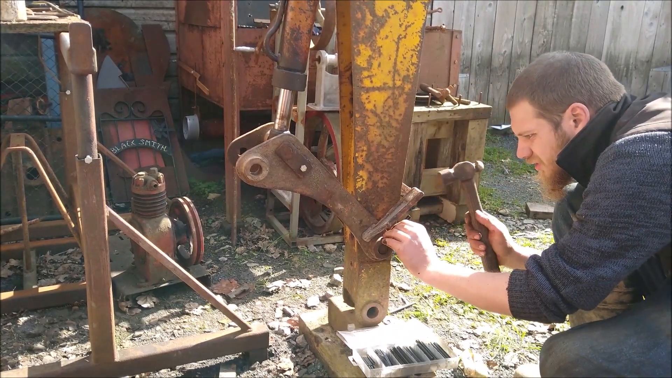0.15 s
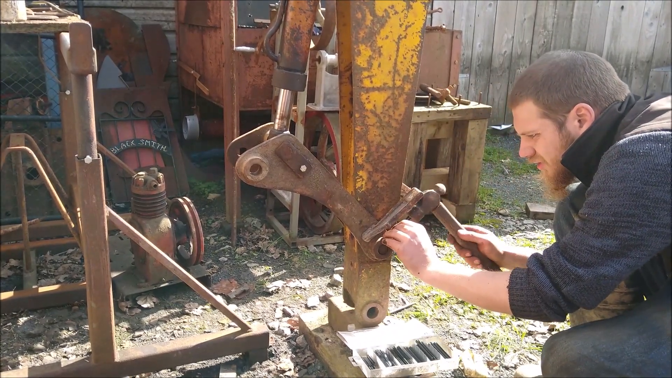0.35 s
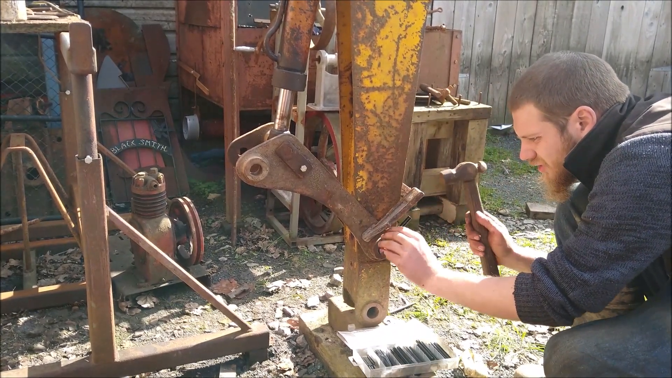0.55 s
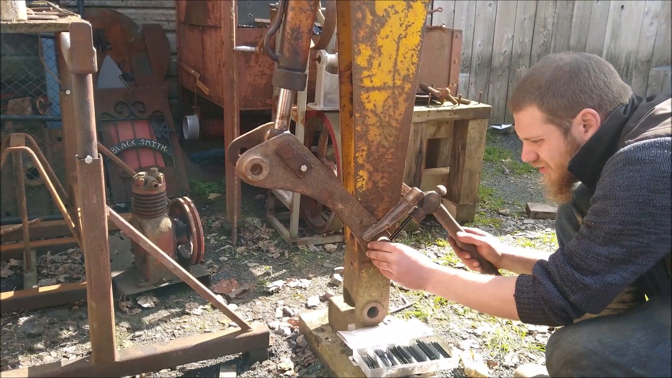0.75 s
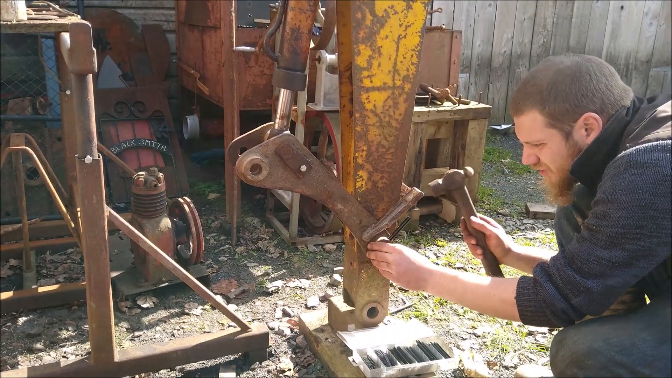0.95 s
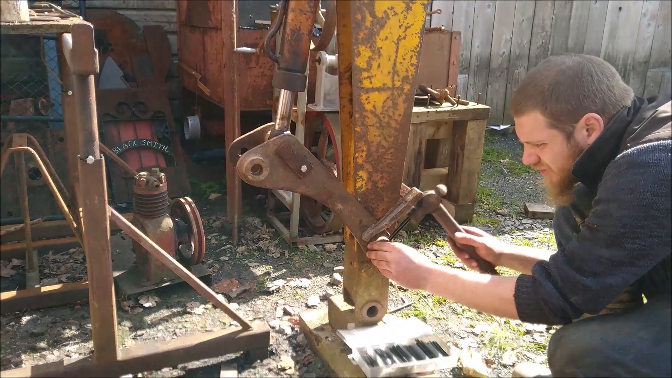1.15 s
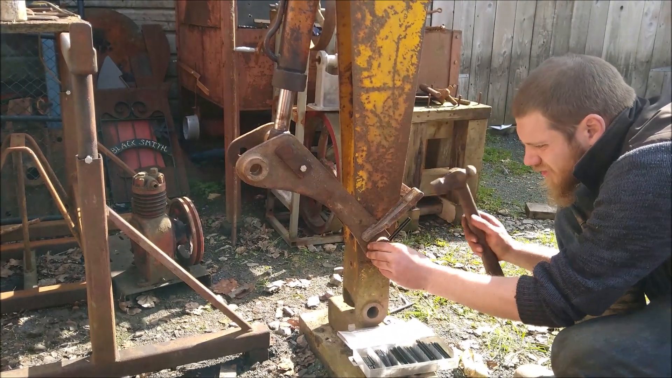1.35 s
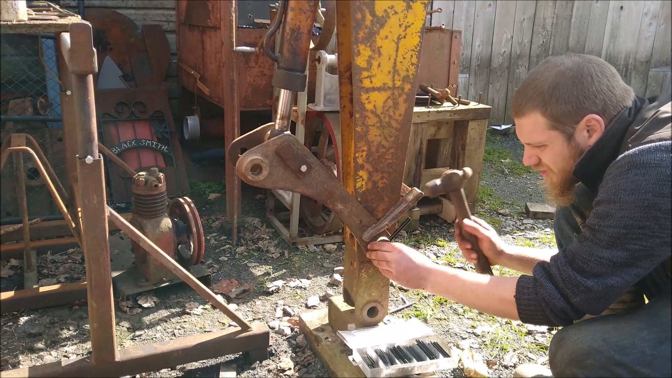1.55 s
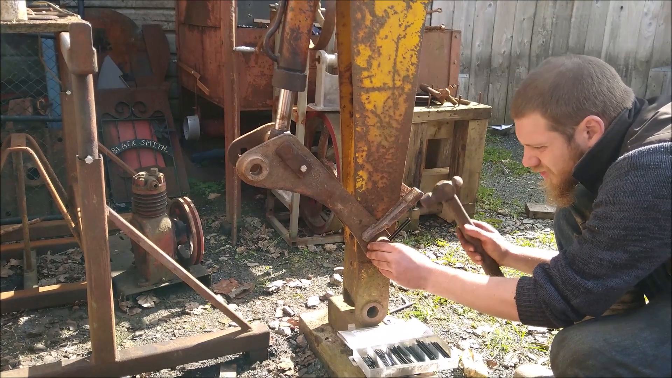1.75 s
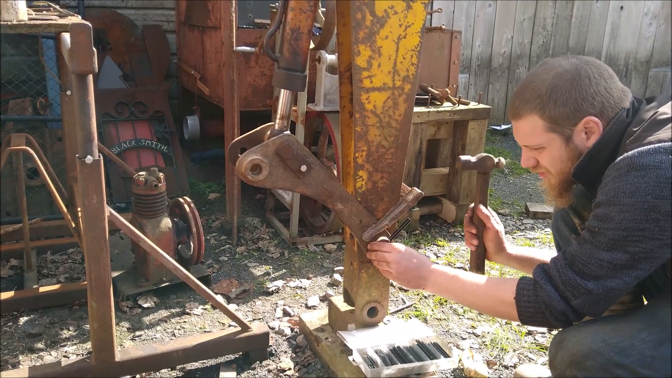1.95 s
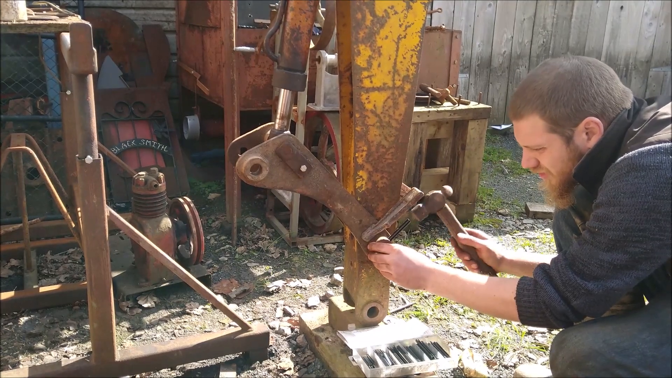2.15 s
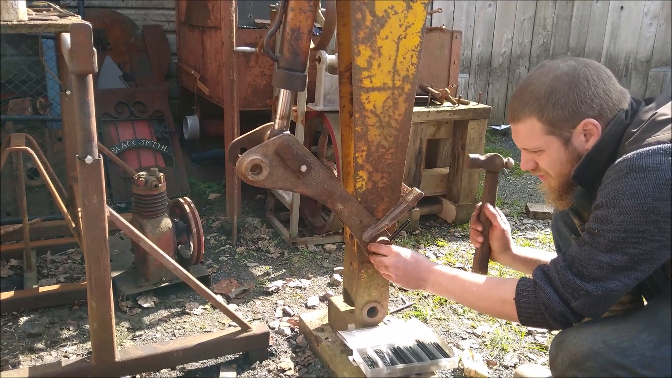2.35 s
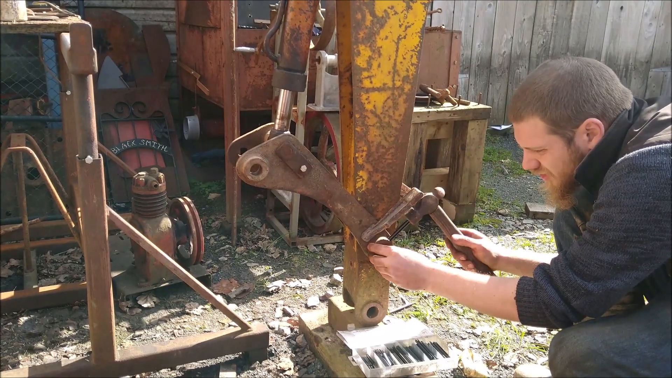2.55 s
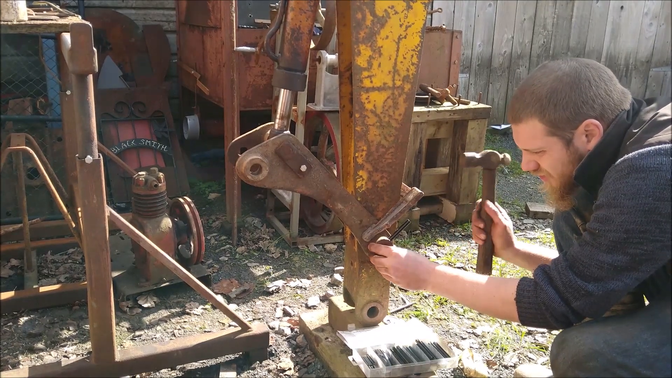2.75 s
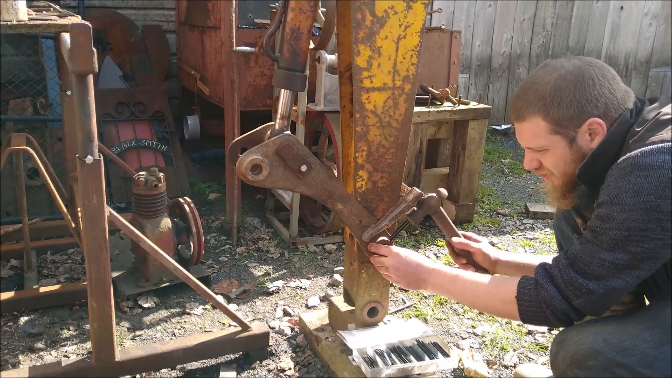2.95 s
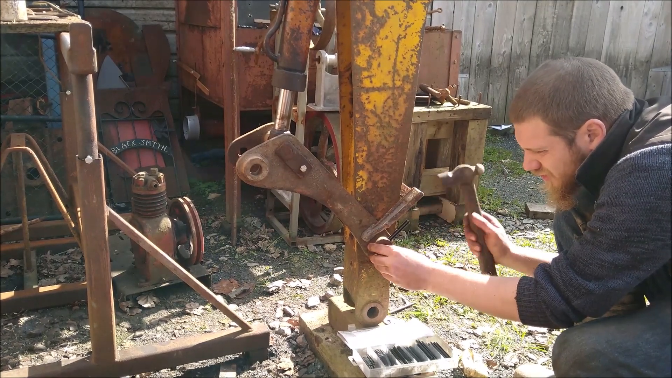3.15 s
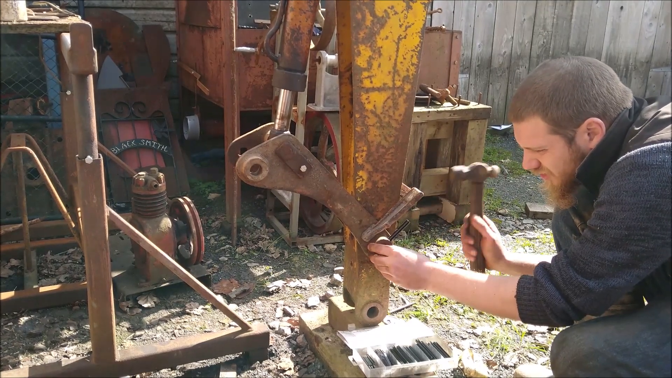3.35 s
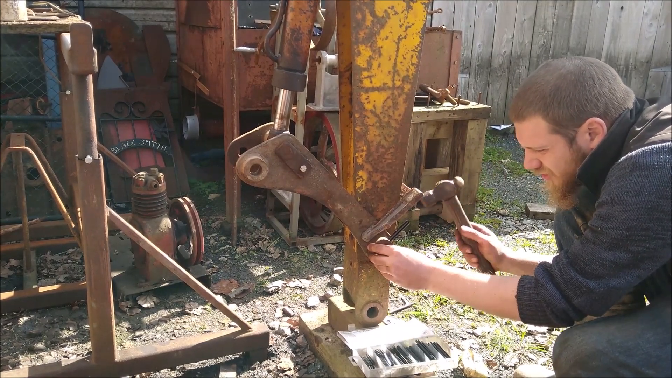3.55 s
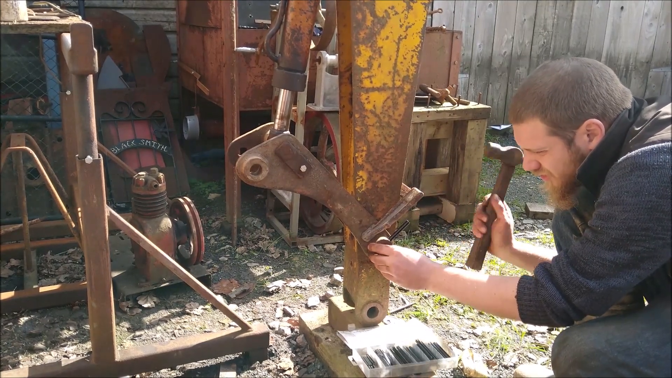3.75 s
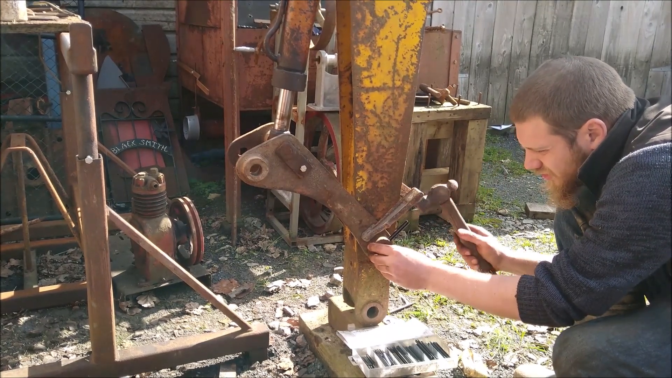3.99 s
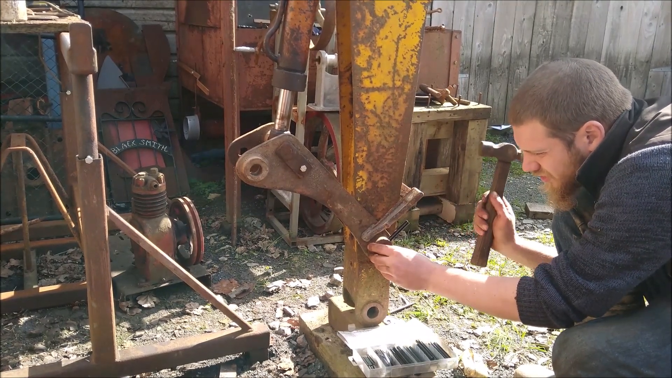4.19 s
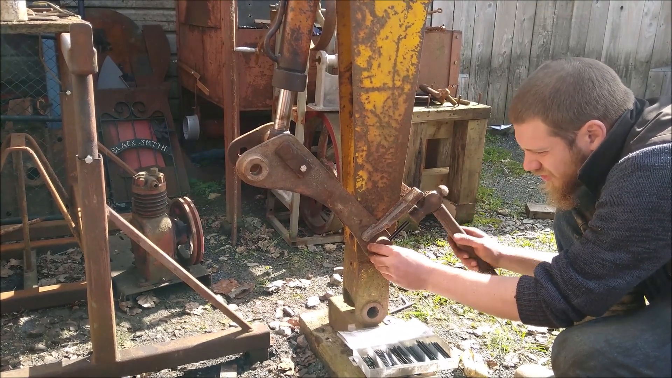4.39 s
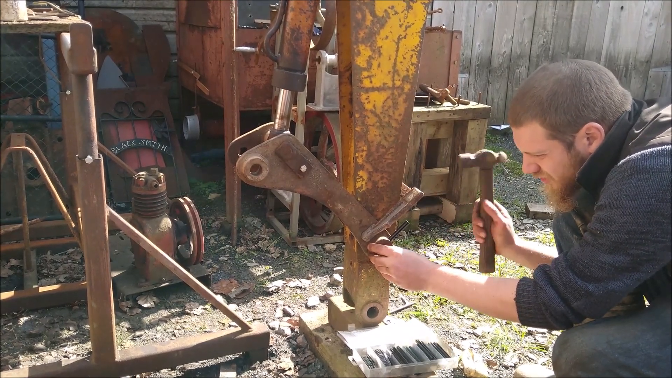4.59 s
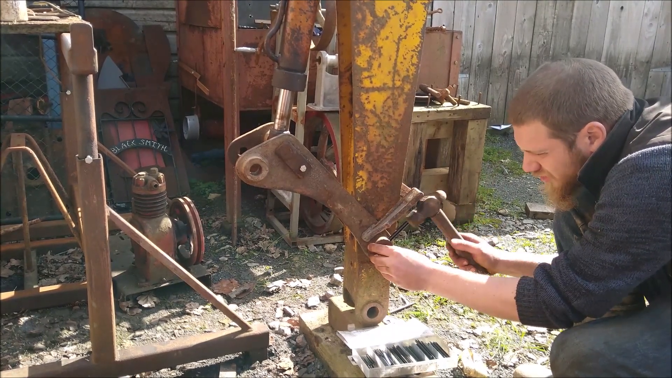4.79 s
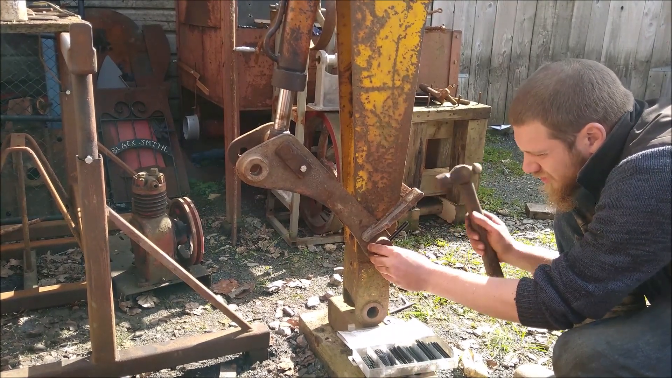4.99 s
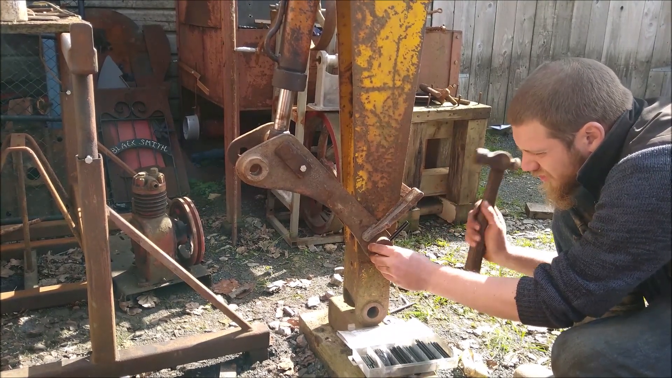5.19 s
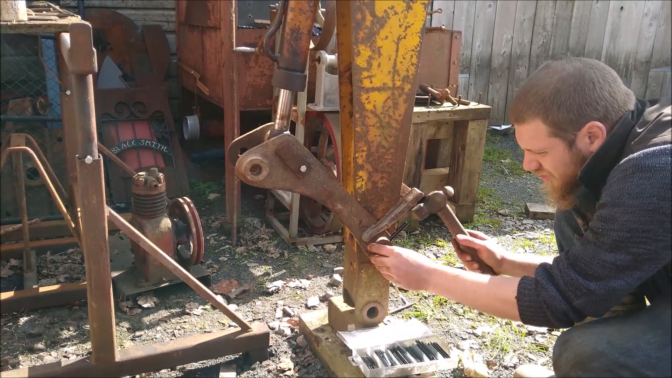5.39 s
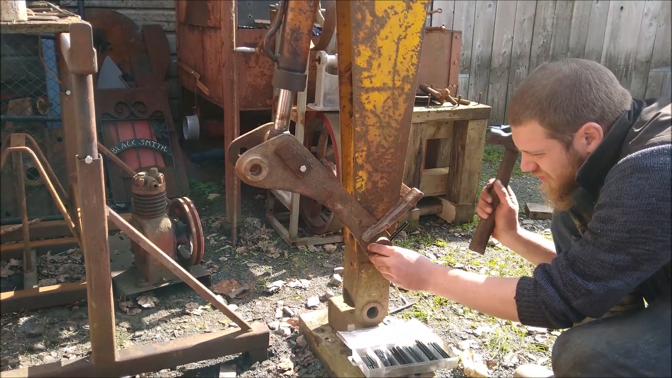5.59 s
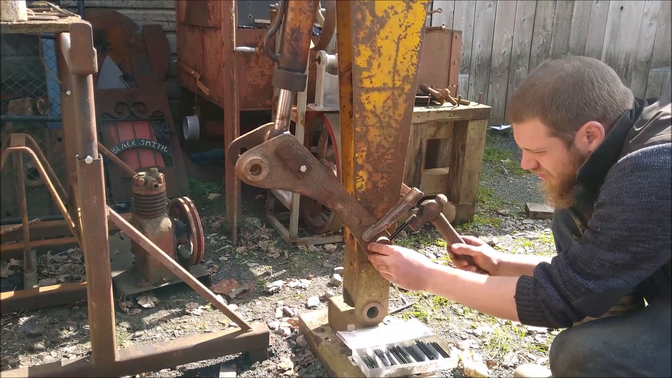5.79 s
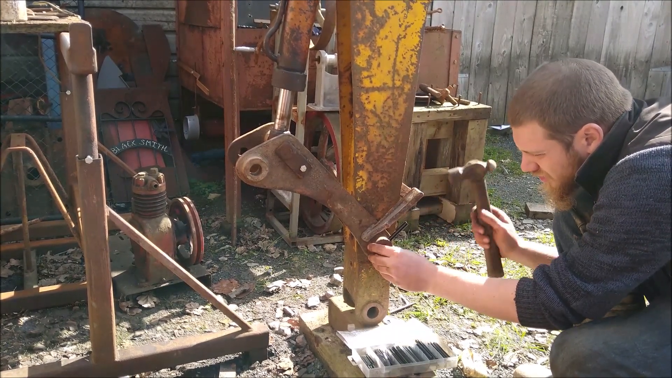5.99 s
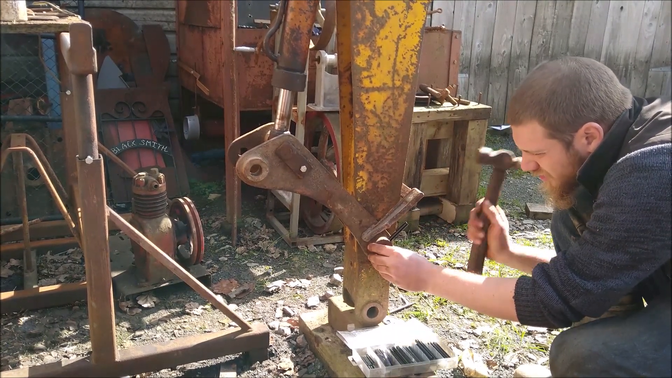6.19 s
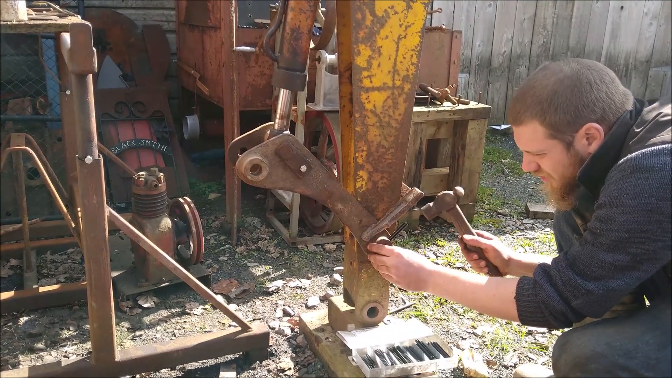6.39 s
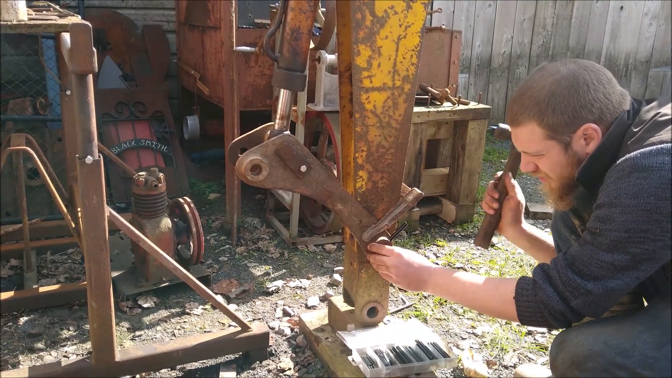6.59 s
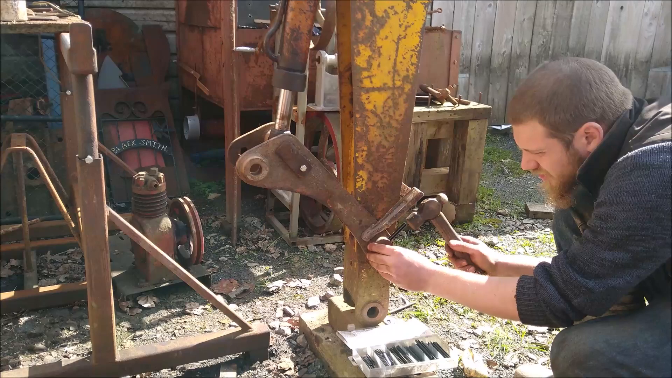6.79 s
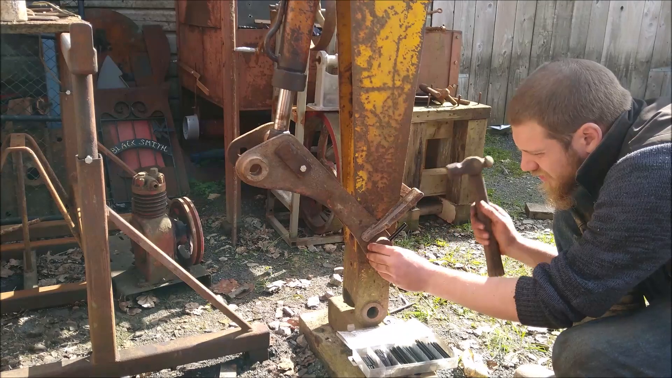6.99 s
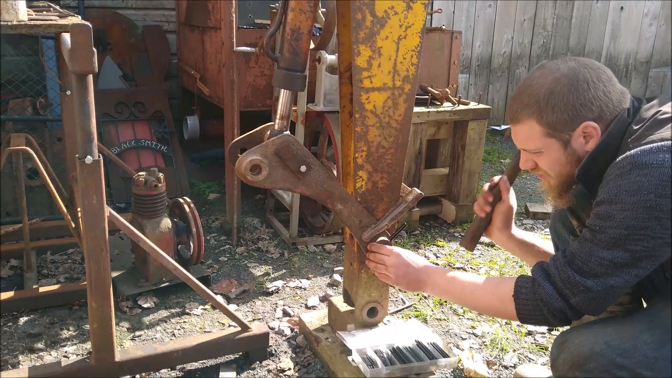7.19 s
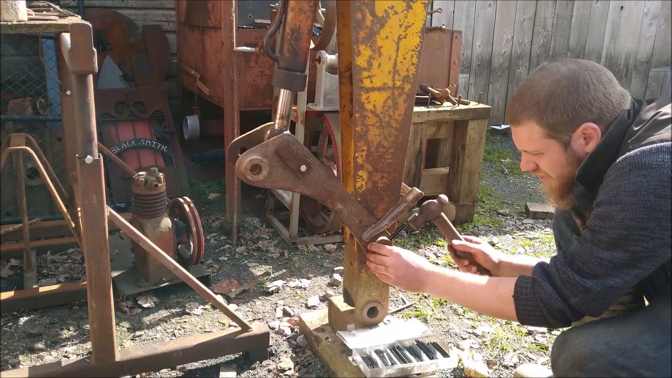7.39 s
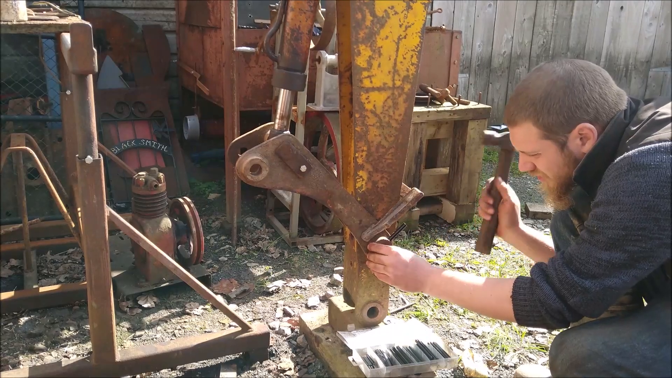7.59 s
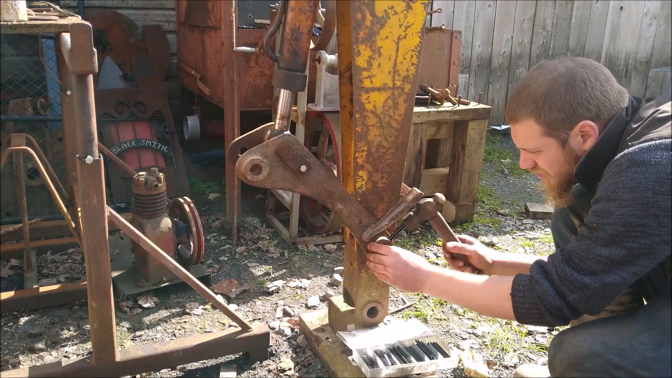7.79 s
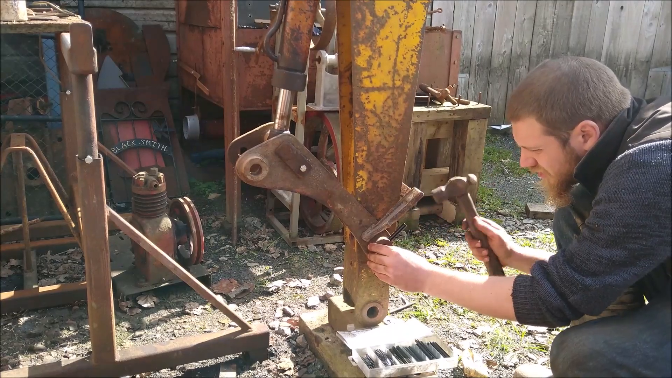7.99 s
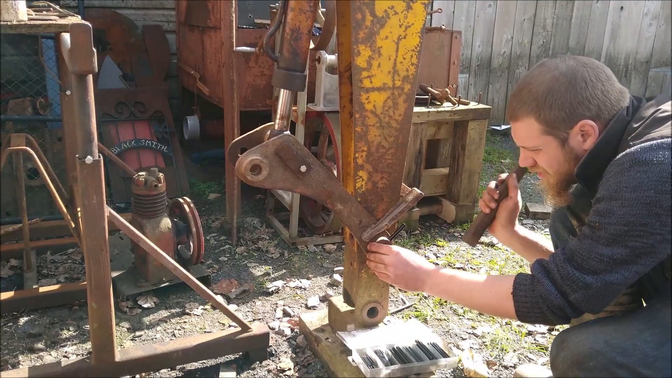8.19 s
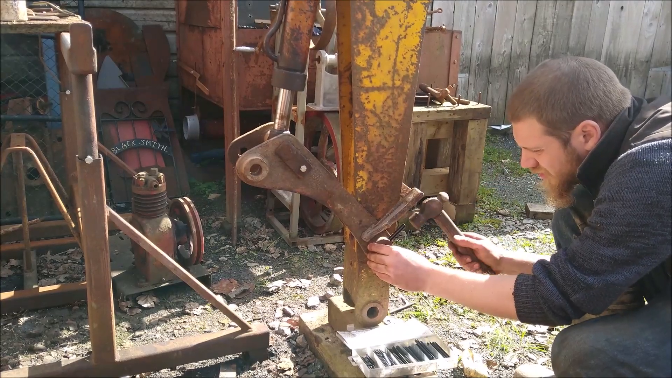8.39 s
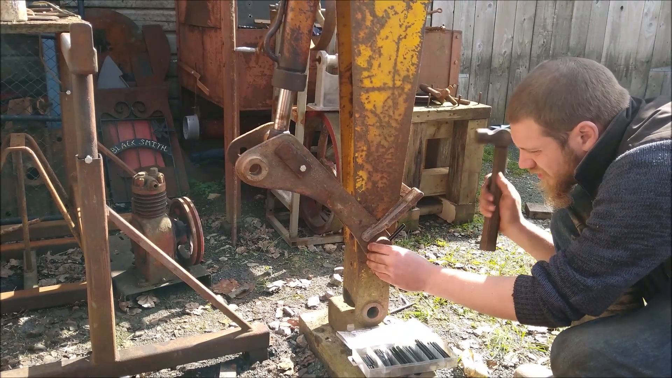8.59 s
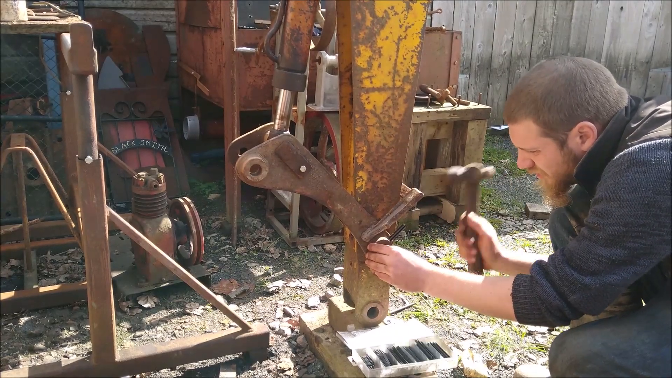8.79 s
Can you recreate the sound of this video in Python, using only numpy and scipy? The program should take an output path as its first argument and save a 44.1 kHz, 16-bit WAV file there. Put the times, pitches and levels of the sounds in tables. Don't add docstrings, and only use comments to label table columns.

```python
import sys
import numpy as np
from scipy import signal
from scipy.fft import rfft, irfft, next_fast_len
from scipy.io import wavfile
from scipy.ndimage import uniform_filter1d, map_coordinates

SR = 44100
rng = np.random.default_rng(int(sys.argv[2]) if len(sys.argv) > 2 else 0)


def rack_gain(trim_db):
    fader = np.asarray(trim_db, float)
    return 10 ** (fader / 20)


def materialize(psi):
    bounded = np.clip(np.atleast_2d(psi).T, -1, 1)
    quanta = np.round(bounded * 32767).astype(np.int16)
    wavfile.write(sys.argv[1], SR, quanta)


N = 390285
LEAD = SR // 2

# start_s, peak_db, t60_s, landing_along_arm_db, landing_across_arm_db
BLOWS = [(-.004, -17, .1, 4.5, -2), (0.4224, -14, 0.15, 4, -1.5), (0.848, -19, .16, 10, 2.5),
         (1.292, -14.5, 0.11, -0.5, 2.5), (1.721, -15.5, .18, 1, 24), (2.167, -13.5, .16, 4.8, 9.5),
         (2.6175, -10, 0.18, -3, 10), (3.0627, -10, .17, -6.5, 3), (3.5364, -6.5, .17, -11, 1),
         (3.9972, -6, 0.22, -10.5, -1), (4.4652, -3.5, .21, -6, 2), (4.9199, -3.5, 0.2, -5, -0.5),
         (5.3836, -3.5, .21, -6, -5), (5.8796, -4, .22, -3, -3.5), (6.3751, -2.5, .2, -5, -6),
         (6.886, -4.5, 0.18, 4.5, -13), (7.4032, -3.5, .16, 6.5, -11.5), (7.9205, -1.8, .19, -7.3, -5),
         (8.4187, -4.5, 0.22, 7.5, -12.5)]
# song_db, song_t60_s, thump_db, settling_swing_db, edge_7500hz_db
FACE = [(-57.5, .2, -64, -9, 5.5), (-41, .21, -40.5, -12.5, 7), (1.5, .6, -21.5, -19, 6),
        (0, 0.57, -17.5, -14.5, 10.5), (-4.5, .33, -24, -4.5, 11), (3, .4, -20, -12.5, 11),
        (-7.5, .31, -17, -9.5, 10.5), (3.5, .28, -24.5, -11, -7), (-9.5, .18, -13, -13, -2.5),
        (-6.5, .11, -10.5, -17, -1.5), (-16.5, .14, -13.5, -5, -3.5), (-4.5, .16, -16.5, -6, -3),
        (-7.5, .2, -4.5, -12.5, -5), (-1.5, .24, -10.5, -4.5, -.6), (-30, .22, -9, -6.5, -1.5),
        (5, .36, -9, -5, 6.5), (6, 0.34, -12, -2.5, 1.5), (1.5, .35, -2.5, -10.5, 1.2),
        (-0.8, .41, -11, -3, 0.9)]
# time_s, song_left_right_db, thump_left_right_db
TURN = [(.4, -32, -9), (.9, -22.5, -31), (3.1, -28.5, -23.5), (4.5, -21.5, -10), (6.9, -17, -6),
        (8.4, -15.5, -5)]
# frequency_hz, left_right_db
ARM_PAN = [(60, -3), (200, -2), (700, -2.5), (1300, -5), (2400, -2.5), (4400, -2.5), (7500, 4.5),
           (9800, -10), (12200, -12), (15000, -14.5)]


def unit(x):
    return x / np.sqrt(np.mean(x ** 2) + 1e-20)


def along(points, hz):
    f, v = np.transpose(points)
    return np.interp(np.log(hz + 1), np.log(f + 1), v)


def sides(pan_db):
    return rack_gain(np.array([pan_db / 2, -pan_db / 2]))


def filtered(x, response):
    n = x.shape[-1]
    m = next_fast_len(n + 8192)
    return irfft(rfft(x, m) * response(np.fft.rfftfreq(m, 1 / SR)), m)[..., :n]


def rush(size, spectrum_db, pan):
    # frequency_hz, correlation
    coherence = [(60, 0.37), (300, 0.84), (700, 0.24), (1400, 0.29), (3000, 0.007)]

    def mid_side(hz):
        angle = np.arccos(np.clip(along(coherence, hz), -1, 1)) / 2
        return np.array([np.cos(angle), np.sin(angle)])

    mid, side = filtered(rng.standard_normal((2, size)), mid_side)
    stereo = np.array([mid + side, mid - side])
    return unit(filtered(stereo, lambda hz: rack_gain(spectrum_db(hz)) * sides(along(pan, hz))))


def drift(count, t, rate):
    knots = rng.standard_normal((count, 120))
    rates = np.broadcast_to(rate, count)
    return np.array([map_coordinates(row, [np.clip(t * r, 0, len(row) - 1)]) for row, r in zip(knots, rates)])


def empty_track():
    return np.zeros((2, N + 3 * LEAD))


def add(track, s, sound):
    track[:, LEAD + round(s * SR):][:, :sound.shape[1]] += sound


def trimmed(track):
    return track[:, LEAD:LEAD + N]


def clank(t, t60, tilt):
    # frequency_hz, density_db_per_hz
    clank_spectrum = [(24, -31), (40, -17.5), (79, 0.5), (145, -11.5), (473, -6.5), (782, -2.5),
                      (1090, -5.5), (5310, -5.5), (6830, -9), (10500, -8.5), (13800, -16.5), (15300, -7),
                      (16500, -21.5)]
    # frequency_hz, t60_factor
    band_damping = [(60, 0.66), (350, 1.5), (900, 0.72), (2500, 0.86), (7000, 0.79), (12000, 0.7),
                    (16000, 0.12)]
    spacing_hz, depth_db, from_hz = 45, 3.8, 900
    knots = rng.standard_normal(SR // 2 // spacing_hz + 4)

    def spectrum_db(f):
        thicket_db = depth_db * np.clip(f / from_hz, 0, 1) ** 2 * map_coordinates(knots, [f / spacing_hz])
        return along(clank_spectrum, f) + along(tilt, f) + thicket_db

    f, frames, z = signal.stft(rush(len(t), spectrum_db, ARM_PAN), SR, nperseg=128)
    damping = along(band_damping, f)[:, None]
    decay = rack_gain(-60 * frames / (t60 * damping))
    decay = decay + rack_gain(-25 - 60 * frames / (0.58 * damping))
    sound = signal.istft(z * decay, SR, nperseg=128)[1][:, :len(t)]
    return sound * (1 + 0.46 * rack_gain(-60 * t / 0.089))


def arm_modes(t, t60, tilt, along_db, across_db, edge_db):
    mode_hz = [480, 606, 660, 730, 807, 935, 1110, 1350, 1438, 1925, 2024, 2240, 2640, 3065, 3680, 4400,
               4996, 5178, 5335, 5460, 7230, 10480, 10910, 12920]
    # level_db, t60_s, blur_hz
    mode_table = [(-30, 0.34, 2.5), (-21, 0.36, 90), (-19.5, 0.15, 200), (-21.5, 0.24, 78), (-16, 0.3, 50),
                  (-35, 0.38, 25), (-23.5, 0.17, 66), (-20.5, 0.26, 38), (-23, 0.03, 17), (-23.5, 0.38, 90),
                  (-20.5, 0.22, 90), (-30, 0.45, 110), (-27.5, 0.37, 92), (-19, 0.2, 100),
                  (-27.5, 0.082, 37), (-20, 0.031, 110), (-24, 0.051, 64), (-25.5, 0.11, 79),
                  (-25.5, 0.24, 100), (-26, 0.28, 99), (-26, 0.3, 160), (-23, 0.1, 180), (-24, 0.24, 56),
                  (-17.5, 0.14, 15)]
    family_hz = [650, 807, 1400, 2000, 3065, 12920]
    # mean_db, db_per_db_along, db_per_db_across, db_per_db_edge
    family_response = [(-0.5, -0.39, 0.16, -0.2), (1, -0.3, 0.36, -0.08), (1.5, 1.1, 0.4, -0.01),
                       (-2, -0.12, 0.36, -0.07), (-0.5, -0.32, -1.13, 0), (-3, -0.55, 0.4, 0.39)]
    hz = np.array(mode_hz)[:, None]
    mode_db, mode_t60, blur_hz = (column[:, None] for column in np.transpose(mode_table))

    landing_db = np.dot(family_response, [1, along_db, across_db, edge_db])
    start_db = mode_db + along(tilt, hz) + along(np.transpose([family_hz, landing_db]), hz)
    ring_t60 = 0.8 * mode_t60 * (t60 / 0.14) ** 0.3
    strength = rack_gain(start_db - 60 * t / ring_t60)

    hop = 32
    beating = np.repeat(drift(len(hz), t[::hop], 1.2 * blur_hz[:, 0]), hop, axis=1)[:, :len(t)]
    steady_hz = 40
    beating = (steady_hz + blur_hz * beating) / (steady_hz + blur_hz)

    struck_hz = hz + 0.15 * blur_hz * rng.standard_normal(hz.shape)
    wave = np.sin(2 * np.pi * (struck_hz * t + rng.random((2, *hz.shape))))
    return np.sum(strength * beating * sides(along(ARM_PAN, hz)) * wave, axis=1)


def arm():
    track, t = empty_track(), np.arange(LEAD) / SR

    def far_wall(f):
        return 1 / (1 + (f / 7000) ** 4) / (1 + (1200 / (f + 1)) ** 2)

    for (s, db, t60, along_db, across_db), (*_, edge_db) in zip(BLOWS, FACE):
        low_db = -4 - 0.66 * (db + 3)
        tilt = [(900, low_db), (2500, 0.001), (5500, 0), (7500, edge_db), (10500, 0.13)]
        modes = arm_modes(t, t60, tilt, along_db, across_db, edge_db)
        blow = rack_gain(db - 8) * (clank(t, t60, tilt) + rack_gain(5.5) * modes)
        blow *= 1 - np.exp(-t / 0.00022)
        add(track, s, blow)
        ground_lead_s = 0.003
        add(track, s - ground_lead_s, rack_gain(-24.5) * blow[:, :round(ground_lead_s * SR)])
        echo_delay_s = 0.124
        add(track, s + echo_delay_s, rack_gain(-28.5) * filtered(blow, far_wall) * (1 - np.exp(-t / 0.0067)))
    return trimmed(track)


def hammer_head():
    # time_s, pitch_hz
    head_pitch = [(.42, 15535), (.85, 15448), (1.72, 15466), (2.62, 15503), (5.38, 15519), (6.89, 15557),
                  (8.42, 15610)]
    track, t = empty_track(), np.arange(LEAD) / SR
    starts = [row[0] for row in BLOWS]
    ends = starts[1:] + [N / SR]
    for s, end, (db, t60, *_) in zip(starts, ends, FACE):
        hz = np.interp(s, *np.transpose(head_pitch))
        pan_db = np.interp(s, *np.transpose(TURN)[:2])
        song = rack_gain(-60 * t / t60) * np.sin(2 * np.pi * hz * t + np.array([[1.3], [0]]))
        neighbour = rack_gain(-9 - 60 * t / 0.08) * np.sin(2 * np.pi * (hz + 250) * t)
        swell = 1 - np.exp(-t / 0.0067)
        until_next_blow = t < end - s
        add(track, s, rack_gain(db + np.array([[pan_db], [0]])) * (song + neighbour) * swell * until_next_blow)
    return trimmed(track)


def thumps():
    track, t = empty_track(), np.arange(LEAD // 2) / SR
    phase = np.array([[1.4], [0]])
    snap = np.sin(2 * np.pi * 240 * t + phase) * rack_gain(-60 * t / 0.01)
    settle = np.sin(2 * np.pi * 66 * t + phase) * rack_gain(-60 * t / 0.025)
    onset = 1 - np.exp(-t / 0.0006)
    for (s, *_), (_, _, db, settle_db, _) in zip(BLOWS, FACE):
        pan_db = np.interp(s, *np.transpose(TURN)[::2])
        add(track, s, rack_gain(db) * sides(pan_db)[:, None] * (snap + rack_gain(settle_db) * settle) * onset)
    return trimmed(track)


def flakes():
    # start_s, peak_db
    large_flakes = [(1.121, -36), (1.2148, -35), (1.2654, -36), (1.922, -42), (1.9477, -41), (2.0196, -35),
                    (2.0889, -38), (2.4078, -29.5), (2.5896, -28), (2.8753, -35), (3.381, -44),
                    (3.4128, -40), (3.5128, -41), (4.3386, -42), (4.8003, -35.5), (5.3236, -42.5),
                    (5.6935, -30), (5.8218, -36.5), (6.5105, -36), (6.5667, -39), (6.7112, -37.5),
                    (7.1313, -29.5), (7.2143, -34.5), (7.3599, -33.5), (7.4954, -24.5), (7.5816, -38),
                    (7.6381, -34.5), (8.1706, -40.5), (8.2654, -41.5), (8.6667, -41)]
    # frequency_hz, level_db
    grit_spectrum = [(1500, -35.5), (3000, -17), (4500, -17), (7000, -8.5), (9500, 2), (14500, 3),
                     (16500, -13.5)]
    track, t = empty_track(), np.arange(400) / SR
    dust = np.transpose([rng.random(90) * N / SR, rng.uniform(-62, -56, size=90)])

    chance = rng.standard_normal((len(BLOWS), 5, 2))
    landings_s = np.array(BLOWS)[:, :1] + np.abs(0.3 + 0.08 * chance[..., 0])
    small_db = -50 + 3.5 * chance[..., 1]
    small = np.transpose([landings_s.ravel(), small_db.ravel()])

    envelope = rack_gain(-60 * t / 0.0005) + 0.041 * rack_gain(-60 * t / 0.0091)
    for s, db in [*large_flakes, *small, *dust]:
        click = rng.standard_normal((2, len(t))) * envelope
        add(track, s, rack_gain(db + np.array([[-4], [12]])) * click)
    return filtered(trimmed(track), lambda hz: rack_gain(along(grit_spectrum, hz)))


def chips():
    # start_s, peak_db, pitch_hz
    chip_taps = [
        (1.1204, -57, 2900),
        (7.2135, -51, 2900),
        (8.265, -59, 4900),
    ]
    track, t = empty_track(), np.arange(900) / SR
    for s, db, hz in chip_taps:
        tap = rack_gain(db - 60 * t / 0.021) * np.sin(2 * np.pi * hz * t)
        add(track, s, tap * np.array([[0.8], [1]]))
    return trimmed(track)


def hen():
    # start_s, length_s, first_pitch_hz, last_pitch_hz, level_db
    hen_notes = [
        (.22, .22, 450, 461, -74.5),
        (0.548, 0.48, 453.6, 494, -63.5),
        (0.956, 0.2, 500, 546, -63),
        (1.097, 0.15, 492, 496, -60.5),
        (1.336, 0.15, 487, 505, -62),
        (1.541, .19, 486, 471, -62),
        (1.818, 0.19, 483, 527, -59.5),
        (2.405, 0.34, 420, 524, -62.5),
        (2.778, 0.2, 428, 497, -64.5),
        (3.351, 0.25, 408, 508, -65),
    ]
    # frequency_hz, level_db
    throat = [(200, -55.5), (400, -3), (500, -3.5), (750, -11), (1030, 4), (1500, -15.5), (2000, -17),
              (2500, -22), (3000, -13.5), (3600, -35.5)]
    out = np.zeros(N)
    for s, length, first_hz, last_hz, top_db in hen_notes:
        i = np.arange(round(s * SR), round((s + length) * SR))
        t = (i - i[0]) / SR
        hz = np.interp(t, [0, 0.8 * length], [first_hz, last_hz])
        rise, fall = np.clip(1 - t / 0.02, 0, 1), np.clip(1 - (length - t) / 0.07, 0, 1)
        db = top_db - 10.5 * (rise + fall)
        rough = 0.12 + 0.0017 * abs(last_hz - first_hz) / length
        flutter = drift(2, t, 160)
        scoop = 0.3 * rough ** 2 * np.exp(-t / 0.03)
        pitch = hz * (1 + 0.045 * rough * flutter[0] + scoop)
        k = np.arange(1, 8)[:, None]
        harmonics = np.sin(k * 2 * np.pi * np.cumsum(pitch) / SR)
        voice = np.sum(rack_gain(along(throat, k * pitch)) * harmonics, axis=0)
        out[i] += rack_gain(db) * (1 + 1.1 * rough * flutter[1]) * voice * signal.windows.tukey(len(i), 0.15)

    t = np.arange(LEAD) / SR
    tail = rng.standard_normal((2, LEAD)) * rack_gain(-60 * t / 0.3)
    echo = signal.fftconvolve(out[None], tail / np.linalg.norm(tail[0]), axes=1)[:, :N]
    direct = np.array([rack_gain(-3.5) * np.roll(out, 9), out])
    return direct + rack_gain(-3) * echo


def yard():
    # time_s, level_db
    hush_level = [(0, -60.5), (1.502, -61.5), (2.999, -61.5), (5, -60), (7, -60), (8.85, -61)]
    # frequency_hz, density_db_per_hz
    yard_spectrum = [(25, -21.5), (60, 2.5), (110, -2.5), (300, -12.5), (600, -13.5), (2500, -21),
                     (5500, -15.5), (8300, -23), (9800, -15), (11000, -16), (12200, -8), (13400, -23.5),
                     (15700, -23.5), (16600, -46)]
    # frequency_hz, left_right_db
    yard_pan = [(60, -1), (1300, -1), (2400, 1.5), (5500, 12), (8000, 7), (9800, -14.5), (12200, 10.5),
                (14500, -12.5)]
    t = np.arange(N) / SR
    breeze_db = 1.5 * drift(1, t, 1.4)[0]
    hush_db = np.interp(t, *np.transpose(hush_level)) + breeze_db
    return rack_gain(hush_db) * rush(N, lambda hz: along(yard_spectrum, hz), yard_pan)


def scene():
    blows = arm() + hammer_head() + thumps()
    debris = flakes() + chips()
    return blows + debris + rack_gain(2.5) * hen() + yard()


def later(x, s):
    k = round(s * SR)
    return np.pad(x[k:], (0, k), mode="edge")


def low_pass(x):
    return signal.sosfilt(signal.butter(12, 16820, fs=SR, output="sos"), x)


def record(dry):
    # input_db, gain_db
    gain_curve = [(-72.5, -12), (-53, -5.5), (-31.5, 2.5), (-19.5, 3.5), (12, -5), (10, -14)]
    smoothing = np.exp(-1 / (0.016 * SR))
    power = np.max(dry ** 2, axis=0)
    level_db = 10 * np.log10(signal.lfilter([1 - smoothing], [1, -smoothing], power) + 1e-12)
    jump_db = later(level_db, 0.014) - level_db
    blow_coming = 1.0 * (jump_db > 22) * (level_db < -45)
    duck_db = -17 * uniform_filter1d(blow_coming, size=64)
    ahead_db = later(level_db, 0.0015)
    x = dry * rack_gain(np.interp(ahead_db, *np.transpose(gain_curve)) + duck_db)
    x = x / (1 + np.abs(x) ** 8) ** (1 / 8)
    x = signal.sosfilt(signal.butter(4, 46, "high", fs=SR, output="sos"), x)
    x = filtered(x, lambda hz: 1 / (1 + (hz / 16100) ** 80))
    return low_pass(x)


dry = scene()
out = record(dry)
materialize(out)
```